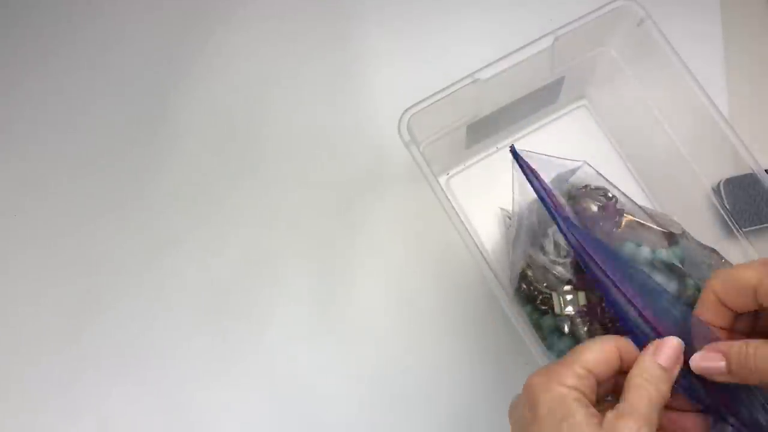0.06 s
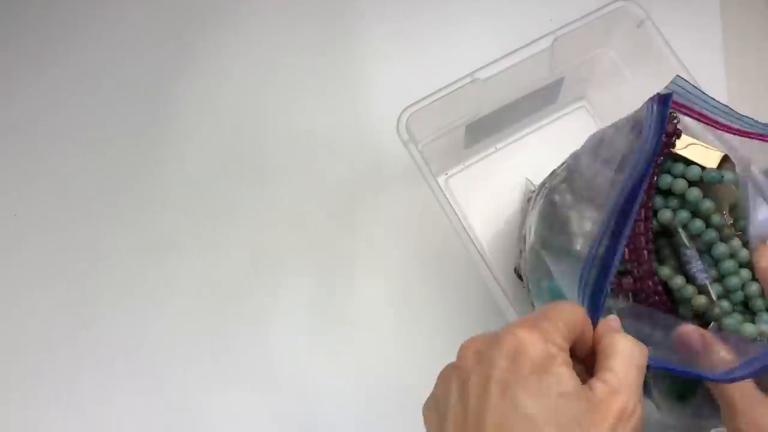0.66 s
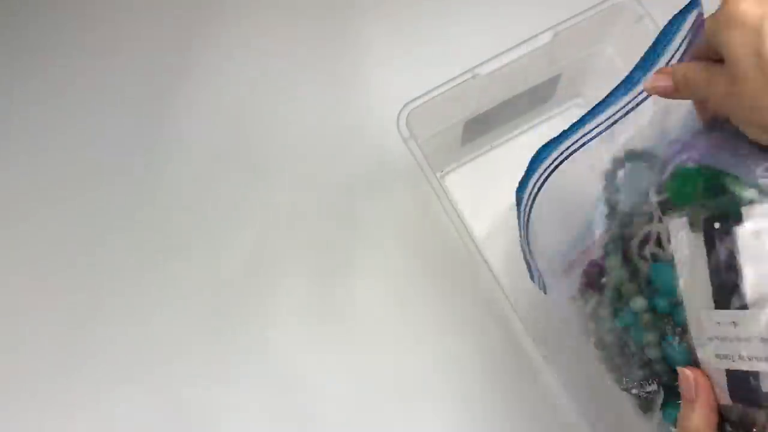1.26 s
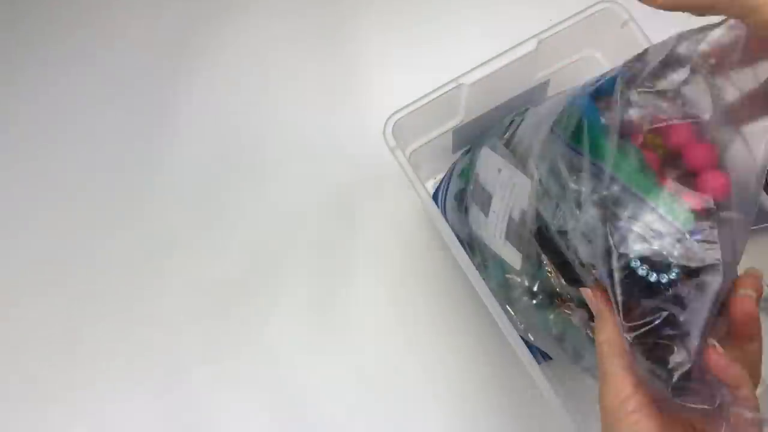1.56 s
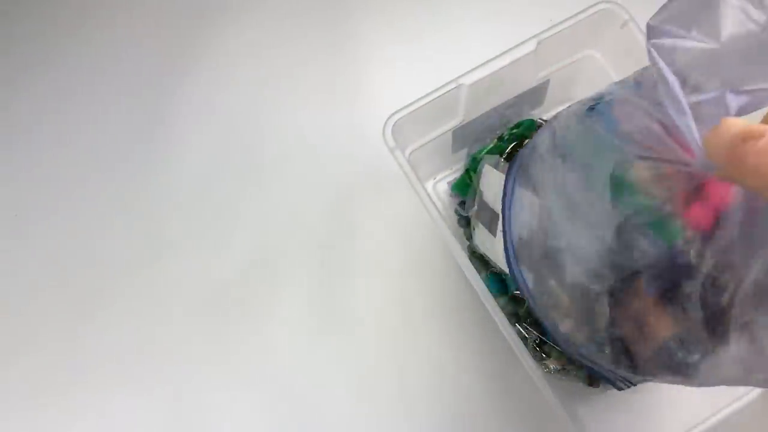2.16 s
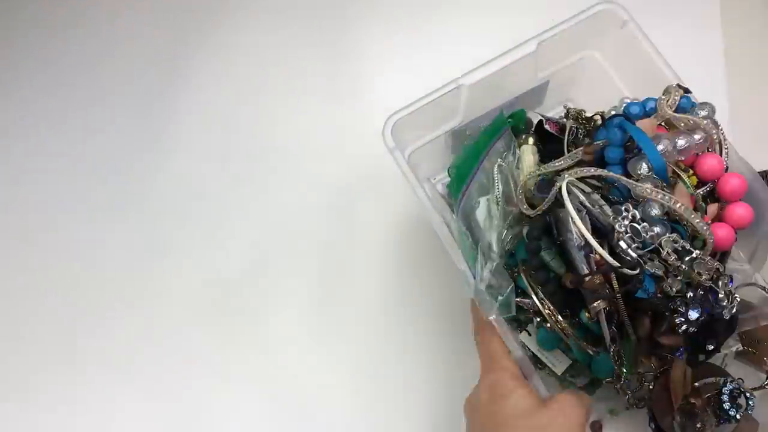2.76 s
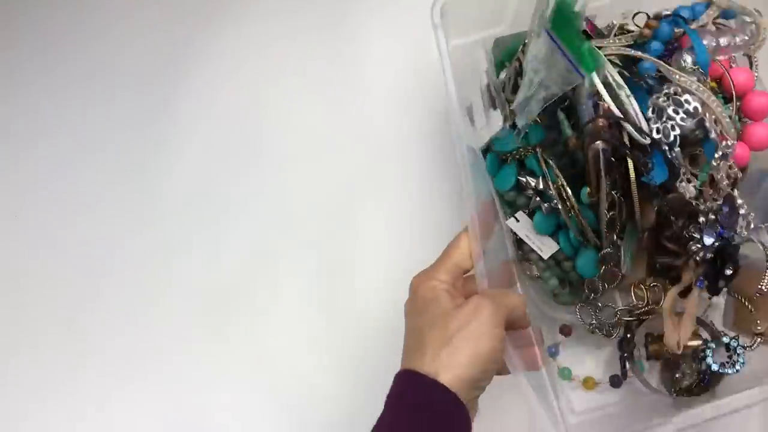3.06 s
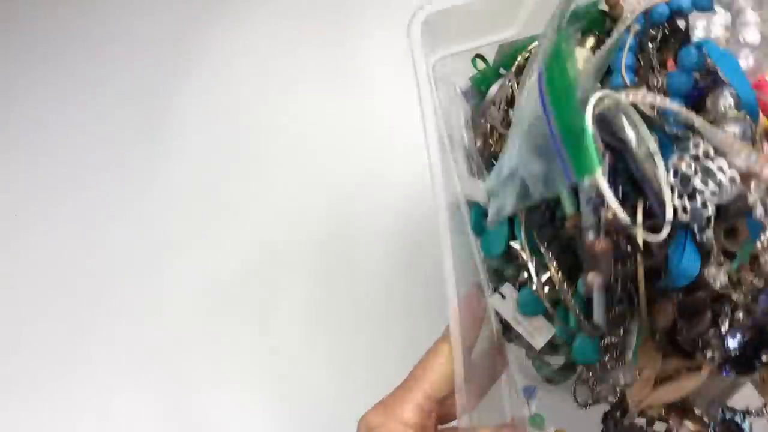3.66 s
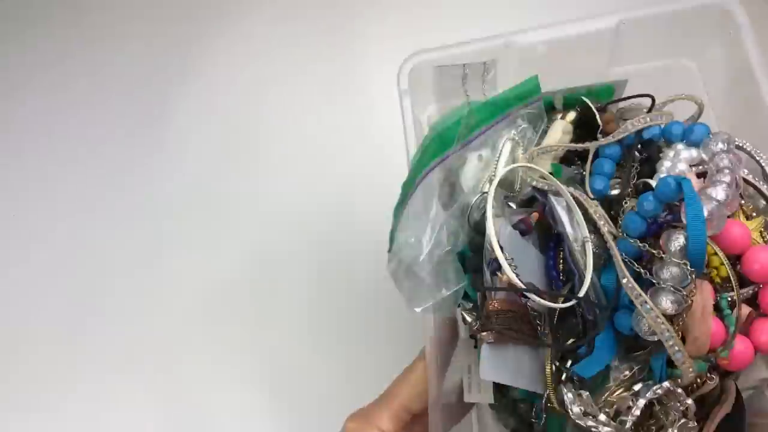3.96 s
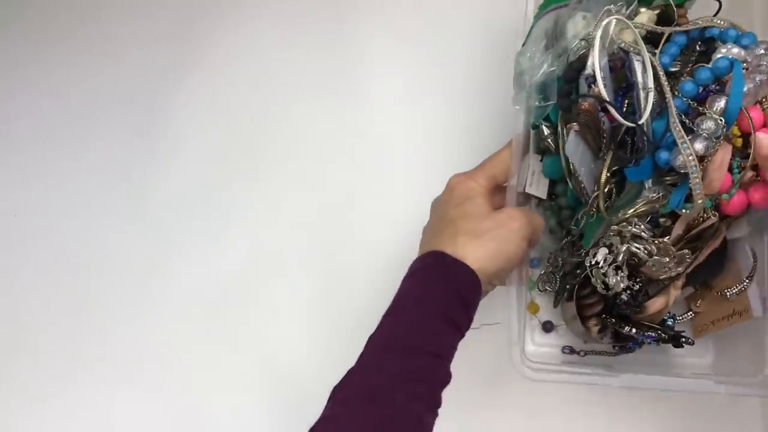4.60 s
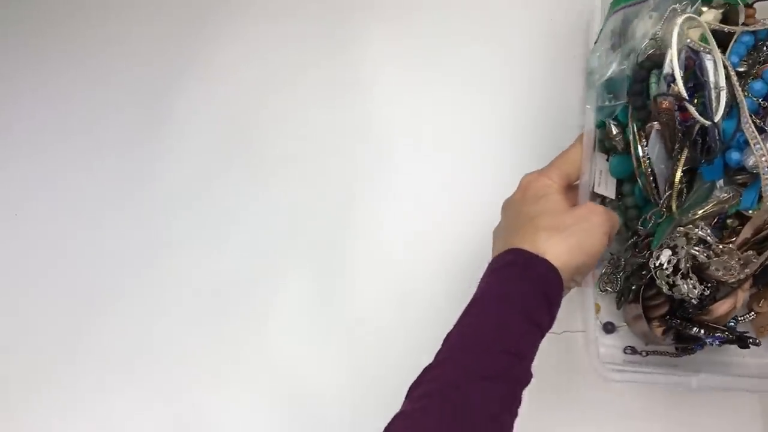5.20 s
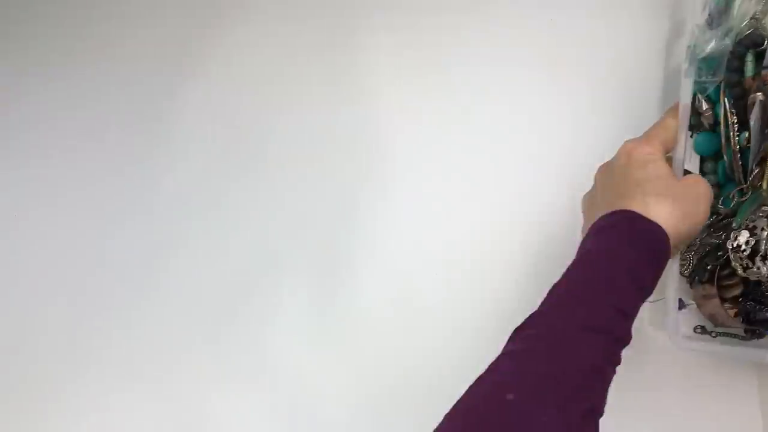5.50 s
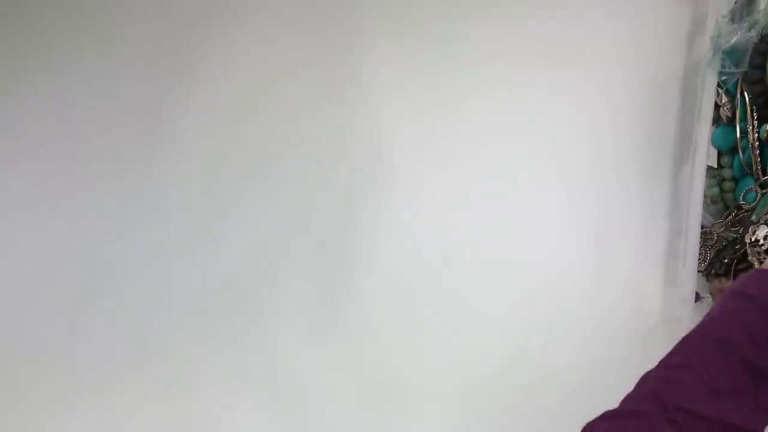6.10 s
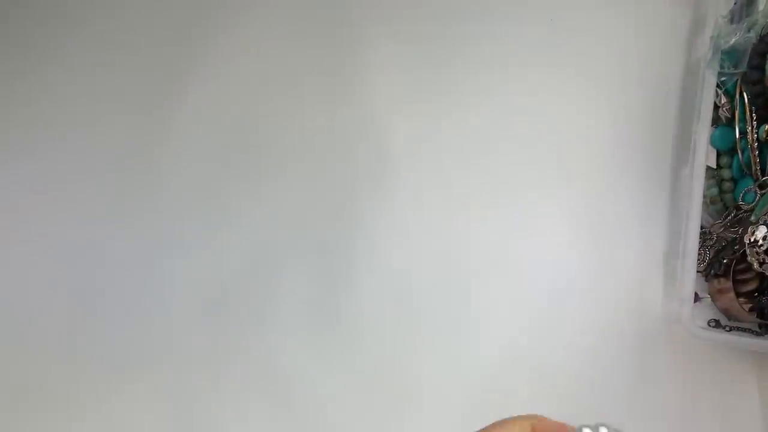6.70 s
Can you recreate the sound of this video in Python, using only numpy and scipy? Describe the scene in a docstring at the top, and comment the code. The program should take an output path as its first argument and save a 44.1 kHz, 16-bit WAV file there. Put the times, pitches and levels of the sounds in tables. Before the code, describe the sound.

Close up in a small room, thin plastic crackles and snaps as a bag is opened. Beads and bangles tumble out with dense clicks and hollow knocks as they land in a plastic tub. The full tub chatters down onto the table, then scrapes softly across it, with chains and small metal pieces jingling inside. The sound thins to a faint brush of a sleeve and a soft thump of a hand on the table.

```python
"""A zip bag of costume jewellery is pulled open, its film crinkling and snapping. From about 1.5 s
strings of beads spill into a plastic tub, whose walls ring lower as it fills. Near 3.8 s the tub is
set down and chatters on the table. From about 4.3 s it is pushed aside: its foot rubs and the metal
pieces inside jingle. Last, a sleeve brushes faintly as the arm withdraws.
All along, hands bump the table softly and a small room adds a short echo."""
import sys
import numpy as np
from scipy import signal
from scipy.fft import rfft, irfft
from scipy.io import wavfile
from scipy.ndimage import uniform_filter1d

SR = 44100
rng = np.random.default_rng(int(sys.argv[2]) if len(sys.argv) > 2 else 0)


def file_out(sig):
    """Save sig as 16-bit WAV at sys.argv[1]."""
    # one column per channel
    cols = np.atleast_2d(sig).T
    # limit, then scale
    lim = np.clip(cols, -1, 1)
    pcm = np.round(lim * 32767).astype(np.int16)
    wavfile.write(sys.argv[1], SR, pcm)


N = 302085
TIME = np.arange(N) / SR

# Tone of the crisp film and of the duller heap of beads. Each row: frequency in Hz, relative level in dB.
FILM_TONE = [(1200, -35.5), (2400, -9.5), (3300, 6.5), (5000, 4), (8000, 1.5), (11000, 3), (14000, 6.5),
             (15500, 1.5)]
HEAP_TONE = [(60, -12.5), (150, -4), (300, -3), (520, -4), (800, 0.5), (1050, -1), (1600, -3.5),
             (2500, -3.5), (3400, -10.5), (6000, -8.5), (14000, -45)]
# Tugs of the bag and slips of the heap. Each row: peak time in seconds, level in dB, body compared
# with treble in dB, rise and fall in seconds, bead pitch in Hz (low for large beads).
SURGES = [(.05, -49.5, 4.5, 0.086, 0.17, 1905), (.21, -59.5, 8, .07, 0.13, 1683),
          (0.278, -27, -0.5, 0.0082, 0.12, 1110), (0.432, -39, 3.5, 0.025, 0.16, 1140),
          (0.689, -41, 4.5, 0.04, 0.16, 1243), (.76, -33.5, -2, 0.065, 0.11, 1430),
          (.84, -41, 2, 0.045, 0.24, 1394), (1.12, -35, 0, 0.061, .08, 1340),
          (1.217, -37.5, -5, 0.019, 0.086, 1690), (1.41, -37, 0.5, 0.24, 0.19, 1590),
          (1.476, -30.5, 0.5, 0.043, 0.12, 1596), (1.528, -28, 0, 0.069, 0.1, 1640),
          (1.77, -35.5, -0.5, 0.2, 0.29, 1588), (1.998, -29, 2.5, 0.067, 0.075, 1250),
          (2.201, -36.5, 2.5, .09, 0.15, 970), (2.257, -31, -7, 0.063, 0.11, 1222),
          (2.465, -45, 3.5, 0.063, .06, 1400), (2.526, -31, 5, 0.068, 0.039, 1485),
          (2.604, -24, 2.5, 0.039, 0.035, 1624), (2.66, -27, 4, 0.041, 0.068, 1723),
          (2.89, -44, -0.5, 0.067, .15, 1860), (2.997, -27.5, 0.5, 0.045, 0.048, 1950),
          (3.06, -43.5, 1, 0.14, 0.092, 2004), (3.165, -42, 0.5, 0.036, .15, 2300),
          (3.25, -41, 0, 0.077, 0.19, 2290), (3.452, -50, 4.5, 0.1, 0.12, 2000),
          (3.697, -44.5, 4.5, 0.075, 0.058, 1135), (3.773, -20.5, 2.5, 0.021, 0.072, 1024),
          (3.838, -24.5, -0.5, 0.079, 0.14, 1000), (3.958, -31.5, -6, 0.046, 0.095, 1150),
          (4.009, -32.5, -1.5, 0.069, 0.12, 1170), (4.327, -44, 3, 0.12, 0.037, 2090)]

def pour():
    """Creases and beads tick brightly; the same contacts shake the heap and the tub, which sound lower."""
    peak_s, db, body_db, rise_s, fall_s, hz = np.transpose(SURGES)
    surges = swells(peak_s, rise_s, fall_s)
    # the strongest surge of the moment sets the pitch of the rolling beads
    power = (surges * undb(db)[:, None]) ** 2 + 1e-30
    bead_hz = per_sample(hz @ power / power.sum(0))
    ticks = crackle(per_second=1000, spread_db=5.3, tick_s=.0007, ring_t60=.028, ring=.5, pieces=60)
    grit = crackle(per_second=500, spread_db=6, tick_s=.0002, ring_t60=.01, ring=.2, pieces=12)
    clacks = crackle(per_second=520, spread_db=5.3, tick_s=.003, ring_t60=.02, ring=0, pieces=24)
    # the finest creases add very short, gritty ticks
    fine_creases = colour(grit, [(4000, -4), (9000, -6), (15000, -18)])
    treble = .99 * colour(ticks, FILM_TONE) + undb(-14) * fine_creases
    heap = colour(.5 * ticks + .5 * clacks, HEAP_TONE) + undb(-8.5) * rolling(clacks, bead_hz)
    body = heap + through_tub(clacks, wall_db=-24.5, floor_db=-29.5)
    return together(surges, db) * treble + together(surges, db + body_db) * body


def rolling(clatter, bead_hz, width_octaves=.78):
    """Rolling beads: keep the part of a clatter that lies near their moving pitch."""
    out = 0
    for centre_hz in np.geomspace(800, 4500, 9):
        nearness = np.exp(-.5 * (np.log2(centre_hz / bead_hz) / width_octaves) ** 2)
        band = signal.lfilter(*signal.iirpeak(centre_hz, 5, fs=SR), clatter)
        out = out + nearness * unit(band)
    return unit(out)


# Film snaps and bead clicks. Each row: start in seconds, relative level in dB, boost of its body in dB.
SNAPS = [(.0405, -30.5, -1), (.063, -21, -6.5), (.1637, -28.5, -2), (.276, -1, -12.5), (.287, -4.5, -29),
         (.3785, -17, -6), (.423, -13, -5), (.448, -19.5, -9), (.5774, -19.5, -32), (.734, -14.5, -21),
         (.7597, -7, -21), (.896, -19.5, -10.5), (.922, -21, -16), (.9793, -22, -7), (1.1117, -16, -13),
         (1.204, -16.5, -10), (1.471, -18, -1), (1.498, -11, -2.5), (1.685, -23, -8), (1.81, -13.5, -13),
         (1.8606, -20.5, 3), (2.2487, -9.5, -10), (2.3105, -11.5, -14.5), (2.52, -12, -19),
         (2.586, -24, -7.5), (2.6455, -7, -21.5), (2.6756, -15.5, -1.5), (2.784, -27.5, -9),
         (2.991, -10.5, -15.5), (3.2306, -15, -24), (3.381, -22.5, -10.5), (3.4516, -23.5, -12.5),
         (3.6156, -29, -5.5), (3.689, -20, -19), (3.7662, -18, -14.5), (3.773, -4, -35), (3.843, -6, -28),
         (3.9494, -12, -19), (4.3125, -32, 6.5), (4.336, -18, -33)]

def snaps():
    """A crease snaps or two beads hit; plastic hardly rings."""
    return clicks(SNAPS, FILM_TONE, bright_db=3, body_db=9.5,
                  ring_t60=.02, ring=.3, crack_s=.0011, rattle_s=.0075)


# Bangles and large beads. Each row: start in seconds, pitch in Hz, level in dB, ring time in seconds.
CHINKS = [(.164, 3520, -41, 0.069), (0.21, 2770, -44, 0.035), (1.905, 13200, -30, .12),
          (2.741, 4320, -41, 0.058), (3.222, 2710, -31, .05), (3.23, 2340, -27.5, .08),
          (3.232, 4030, -37.5, 0.06), (4.335, 7540, -36, .04), (5.296, 6270, -25, .04),
          (5.436, 11300, -30, 0.044), (5.506, 6000, -27, 0.067), (5.681, 5800, -52.5, 0.1)]

def chinks():
    """A struck bangle or bead rings briefly with two close notes that beat against each other."""
    out, t = np.zeros(N), np.arange(SR // 4) / SR
    for start_s, hz, db, t60 in CHINKS:
        pair_hz = hz * (1 + .03 * rng.uniform(-.41, 1, (2, 1)))
        notes = np.sin(2 * np.pi * pair_hz * t).mean(0)
        add(out, start_s, undb(db) * notes * fading(t60, t))
    return out


# Notes of the full tub's walls and floor. Each row: pitch in Hz, relative level in dB, ring in seconds.
WALL_NOTES = [(637, -9, .12), (680, -4, .13), (794, -4, .11), (837, 1, .14), (885, -9, .1), (932, -1, .12),
              (974, -5, .1), (1040, -10, .1), (1168, -10, .1), (1539, -6, .09), (1631, -4, .09),
              (1731, -6, .08), (1808, -9, .07), (2016, -10, .08), (2247, -12, .07), (2520, -8, .07)]
FLOOR_NOTES = [(215, -14, .06), (249, 0, .13), (315, -6, .06), (410, -8, .05), (520, -5, .05),
               (600, -6, .04)]
# Blows on the tub. Each row: start in seconds, wall level in dB, floor level in dB,
# hardness in dB per octave (higher is brighter).
KNOCKS = [(1.469, -22.5, -29.5, 0), (1.496, -21, -28.5, 0), (1.975, -23, -58, -3), (2.01, -27, -52, -1),
          (2.249, -19, -39, 2), (2.647, -14, -21, 7), (2.677, -35, -39, 9), (2.995, -21.5, -47, 11.5),
          (3.279, -31, -54, 3.5), (3.642, -31, -33, -5), (3.689, -30.5, -56, 10), (3.815, -15.5, -27, -20),
          (3.823, -15, -30, 2), (3.95, -12, -29, 5.5), (3.998, -18.5, -53, 7), (4.010, -20, -56, 8.5),
          (4.312, -36.5, -29.5, 16), (4.486, -28.5, -66, 3), (4.654, -34.5, -39.5, 4),
          (4.779, -43, -42.5, 16), (5.405, -32, -38, -9), (5.546, -24.5, -28.5, 12)]

def tub(empty_pitch_ratio=1.66, filling_s=(1.5, 3.76)):
    """Each blow makes the floor thud and the walls ring; the walls sink in pitch as the tub fills."""
    out = np.zeros(N)
    for start_s, wall_db, floor_db, hardness in KNOCKS + chatter():
        pitch_ratio = np.interp(start_s, filling_s, (empty_pitch_ratio, 1))
        walls = struck(WALL_NOTES, pitch_ratio, scatter=.005, hardness=hardness)
        floor = struck(FLOOR_NOTES, 1, scatter=.02)
        add(out, start_s, undb(wall_db) * walls + undb(floor_db) * floor)
    return out


def chatter(start_s=3.766, gap_s=.0115, count=12, first_db=-15.5, loss_db=12, hardness=2.6):
    """The tub rocks to rest: more rows of knocks, almost evenly spaced, strong at first, then fading."""
    gaps = gap_s * (1 + .15 * rng.standard_normal(count))
    starts = start_s + np.cumsum(gaps) - gaps
    wall_db = first_db - loss_db * np.linspace(0, 1, count) ** 2
    return [(s, db, db - 23, hardness) for s, db in zip(starts, wall_db)]


def struck(notes, pitch_ratio, scatter, hardness=0):
    """One blow rings all the notes; hard blows favour the high ones, and the shifting load detunes them."""
    t = np.arange(SR // 4) / SR
    hz, db, t60 = np.transpose(notes)[:, :, None]
    weight, detune, side = rng.standard_normal((3, len(notes), 1))
    waves = np.sign(side) * np.sin(2 * np.pi * hz * pitch_ratio * (1 + scatter * detune) * t)
    gains = undb(db + 2 * weight + hardness * np.log2(hz / hz[0]))
    ring = (gains * waves * fading(t60, t)).sum(0)
    return ring / np.abs(ring).max()


def through_tub(contacts, wall_db, floor_db):
    """Small contacts against the tub also stir its walls and floor."""
    walls = unit(convolve(contacts, struck(WALL_NOTES, 1, scatter=0)))
    floor = unit(convolve(contacts, struck(FLOOR_NOTES, 1, scatter=0)))
    return undb(wall_db) * walls + undb(floor_db) * floor


# Tone of the jingling and of the rubbing. Each row: frequency in Hz, relative level in dB.
JINGLE_TONE = [(1500, -9), (3500, -6.5), (5000, -4), (6300, -5.5), (8000, -2), (9600, -6), (10800, -11.5),
               (12000, -18), (16000, -29.5)]
RUB_TONE = [(50, -1.5), (90, 2.5), (125, 8.5), (180, 1.5), (260, -1), (450, 5), (800, -2), (1300, 2),
            (2200, -1.5), (3500, -13), (7000, -9), (14000, -48.5)]
# Pushes of the tub, then a sleeve's faint brushing as the arm withdraws (the last two rows).
# Each row: peak time in seconds, jingle in dB, rubbing in dB, rise and fall in seconds.
MOVES = [(4.36, -59, -48, 0.051, 0.28), (4.495, -46.5, -60, 0.12, 0.23), (4.66, -53, -47.5, .42, 0.44),
         (4.92, -81, -53.5, 0.46, 0.67), (5.298, -41.5, -48, 0.38, 0.57), (5.404, -33.5, -38, 0.18, 0.21),
         (5.562, -34.5, -34.5, 0.056, 0.092), (5.74, -75, -53, 0.44, 0.13), (6.053, -42, -47.5, .1, 0.092),
         (6.54, -63, -66, 0.22, 0.31), (6.84, -87, -64, 0.21, 0.12)]

def slide_and_brush():
    """The tub judders over the table and its chains jingle; the same sounds, faint, make a sleeve's hiss."""
    peak_s, jingle_db, rub_db, rise_s, fall_s = np.transpose(MOVES)
    moves = swells(peak_s, rise_s, fall_s)
    links = crackle(per_second=800, spread_db=5, tick_s=.001, ring_t60=.04, ring=.8, pieces=60)
    slips = crackle(per_second=700, spread_db=4.5, tick_s=.003, ring_t60=.02, ring=0, pieces=16)
    jingle = colour(links, JINGLE_TONE)
    rubbing = colour(slips, RUB_TONE) + through_tub(slips, wall_db=-12.5, floor_db=-24)
    return together(moves, jingle_db) * jingle + together(moves, rub_db) * rubbing


# Tone of small metal pieces. Each row: frequency in Hz, relative level in dB.
METAL_TONE = [(1500, -49), (3500, -11), (5000, -1), (6500, 9.5), (9000, 9), (10500, 0), (12500, -5.5),
              (16000, -12)]
# Metal clinks. Each row: start in seconds, relative level in dB, boost of its body in dB.
CLINKS = [(4.4695, -26.5, -12), (4.4854, -12, -22), (4.502, -18.5, -44), (4.618, -17.5, -30),
          (4.6564, -30.5, 1.5), (4.6725, -24.5, -17), (4.7798, -29.5, -6), (4.968, -35, -34),
          (5.024, -29.5, -32), (5.085, -29.5, -12.5), (5.1155, -21, -16.5), (5.1602, -31, -18),
          (5.183, -27, -17), (5.205, -24.5, -13), (5.2385, -17, -41), (5.2975, -11, -32), (5.3836, -8, -41),
          (5.4044, -13.5, -33), (5.437, -11, -49), (5.5085, -15.5, -31), (5.554, -36, 5),
          (5.7992, -31.5, -41), (5.8301, -37.5, -15), (5.94, -44.5, 5.5), (6.043, -25.5, -11.5),
          (6.2557, -50, -29.5), (6.298, -56, 2), (6.779, -44.5, -7.5)]

def clinks():
    """Metal pieces hit each other in the tub and ring longer than plastic."""
    return clicks(CLINKS, METAL_TONE, bright_db=6.5, body_db=15.5,
                  ring_t60=.051, ring=.58, crack_s=.0072, rattle_s=.0055)


# Hands on the table. Each row: start in seconds, peak level in dB, rise time in seconds.
BUMPS = [(0.228, -29, 0.000067), (0.358, -24.5, 0.0023), (0.438, -24.5, 0.0024), (1.321, -24, 0.00025),
         (1.701, -24, 0.00033), (3.276, -26, 0.0015), (3.895, -26, 0.002), (4.23, -23.5, 0.00042),
         (4.391, -28.5, 0.0013), (4.653, -28.5, 0.0021), (6.47, -16.5, 0.00037)]

def bumps(release_s=.003):
    """A hand gives the table one soft push, with no ringing."""
    out, t = np.zeros(N), np.arange(SR // 10) / SR
    for start_s, db, rise_s in BUMPS:
        push = np.exp(-t / release_s) * (1 - np.exp(-t / max(rise_s, 1e-4))) ** 2
        add(out, start_s, -undb(db) * push / push.max())
    return out


# Tone of the hands' rumble. Each row: frequency in Hz, relative level in dB.
RUMBLE_TONE = [(8, 2.5), (20, -7), (35, -16), (60, -22), (100, -29.5), (200, -42), (500, -86)]

def rumble():
    """A deep noise rises and falls with the effort of the moving hands."""
    times_s = [0, .4, .65, 1.7, 3.3, 4.3, 5, 5.5, 6.8]
    effort_db = np.interp(TIME, times_s, [-5.5, 7.5, -2.5, 3.5, 3.5, -1.5, -3, -4, -2.5])
    return undb(effort_db - 40) * colour(rng.standard_normal(N), RUMBLE_TONE, size=16384)


def room(sound, echo_db=-14, low_t60=.22, high_t60=.1, split_hz=3800):
    """A small room adds a smooth echo whose treble dies first."""
    t = np.arange(SR // 2) / SR
    low_noise, high_noise = rng.standard_normal((2, len(t)))
    low = signal.sosfilt(signal.butter(2, split_hz, fs=SR, output="sos"), low_noise)
    high = signal.sosfilt(signal.butter(2, split_hz, "high", fs=SR, output="sos"), high_noise)
    build_up = 1 - np.exp(-t / .0013)
    tail = (low * fading(low_t60, t) + high * fading(high_t60, t)) * build_up
    return sound + undb(echo_db) * convolve(sound, tail / np.linalg.norm(tail))


# Tone of the quiet room. Each row: frequency in Hz, relative level in dB.
AIR_TONE = [(30, 1.5), (100, -27), (300, -6), (800, -17), (2000, -24), (6000, -23.5), (11000, -38.5),
            (16000, -58)]

def air():
    """Still air is a faint, steady noise."""
    return undb(-70.5) * colour(rng.standard_normal(N), AIR_TONE)


def clicks(rows, tone, bright_db, body_db, ring_t60, ring, crack_s, rattle_s):
    """Each hard contact cracks, rattles its neighbours and pushes into the heap, which gives it body."""
    bright, body = np.zeros(N), np.zeros(N)
    for start_s, db, boost_db in rows:
        click = piece(crack_s, ring_t60, ring) + piece(rattle_s, ring_t60, ring)
        push = piece(crack_s, ring_t60, 0) + piece(rattle_s, ring_t60, 0)
        add(bright, start_s, undb(db) * click)
        add(body, start_s, undb(db + boost_db) * push)
    return undb(bright_db) * colour(bright, tone) + undb(body_db) * colour(body, HEAP_TONE)


def crackle(per_second, spread_db, tick_s, ring_t60, ring, pieces):
    """Many pieces collide at random, most faintly and a few strongly, at an even overall loudness."""
    out, hits = np.zeros(N), int(per_second * N / SR / pieces)
    for _ in range(pieces):
        blows = np.zeros(N)
        strengths = undb(spread_db * np.minimum(rng.exponential(size=hits), 3.2))
        blows[rng.integers(0, N, hits)] = strengths
        out += convolve(blows, piece(tick_s, ring_t60, ring))
    window = SR // 40
    local_power = uniform_filter1d(uniform_filter1d(out ** 2, window), window)
    return out / np.sqrt(local_power + 1e-6)


def piece(tick_s, ring_t60, ring, note_count=7):
    """One small piece or crease ticks; ring sets how strong its high notes are next to the tick."""
    t = np.arange(SR // 12) / SR
    # the second burst is the tick bouncing off the table and the tub's walls
    tick = burst(tick_s, t) + .45 * burst(.004, t)
    size_hz = rng.uniform(3500, 15500)  # a broad peak set by the size of the piece
    if ring:
        tick += 2 * signal.lfilter(*signal.iirpeak(size_hz, 4, fs=SR), tick)
    hz = rng.uniform(5200, 16000, (note_count, 1))
    waves = rng.standard_normal((note_count, 1)) * np.sin(2 * np.pi * hz * t)
    notes = waves.sum(0) * fading(ring_t60, t)
    sound = tick / np.linalg.norm(tick) + ring * notes / np.linalg.norm(notes)
    return sound / np.linalg.norm(sound)


def burst(decay_s, t):
    """A dying puff of noise with a total energy of 1."""
    noise = rng.standard_normal(len(t)) * np.exp(-t / decay_s)
    return noise / np.linalg.norm(noise)


def swells(peak_s, rise_s, fall_s):
    """Each movement's gain, once a millisecond: up 20 dB in its rise time, down 20 dB in its fall time."""
    since = np.arange(0, N / SR, .001) - peak_s[:, None]
    before = -since / np.maximum(rise_s[:, None], 1e-3)
    after = since / np.maximum(fall_s[:, None], 1e-3)
    drop_db = 20 * np.maximum(before, after) ** 1.24  # a power above 1 rounds the peak
    return undb(-np.minimum(drop_db, 200))


def together(movements, db):
    """Gain of overlapping movements, whose powers add."""
    return per_sample(np.linalg.norm(movements * undb(db)[:, None], axis=0))


def per_sample(control):
    """Stretch one value a millisecond to one value a sample."""
    return np.interp(TIME, np.arange(len(control)) / 1000, control)


def colour(sound, tone, size=2048):
    """Filter a sound so that it takes on a tone given as (Hz, dB) points."""
    hz, db = np.transpose(tone)
    grid_hz = np.maximum(np.arange(size // 2 + 1) * SR / size, 1)
    gains = undb(np.interp(np.log(grid_hz), np.log(hz), db))
    # folding the cepstrum keeps the filter from sounding before a hit arrives
    cepstrum = irfft(np.log(gains))
    cepstrum[1:size // 2] *= 2
    cepstrum[size // 2 + 1:] = 0
    response = irfft(np.exp(rfft(cepstrum)))
    return convolve(sound, response / np.linalg.norm(response))


def convolve(sound, response):
    """Pass a sound through a response, keeping its length."""
    return signal.oaconvolve(sound, response)[:len(sound)]


def fading(t60, t):
    """A fade that loses 60 dB in t60 seconds, the ring time."""
    return np.exp(-np.log(1000) * t / t60)


def add(track, start_s, sound):
    """Mix a sound in at its start time."""
    i = max(int(start_s * SR), 0)
    track[i:i + len(sound)] += sound[:N - i]


def undb(db):
    """Turn decibels into a gain."""
    return 10 ** (np.asarray(db) / 20)


def unit(sound):
    """Scale to an average power of 1."""
    return sound / np.sqrt(np.mean(sound ** 2))


def scene():
    """The bag, jewellery and tub echo in the room, over still air and the sounds of the hands."""
    on_table = snaps() + clinks() + pour() + slide_and_brush() + chinks() + tub()
    return (room(on_table) + air() + bumps() + rumble())[None]


def record(dry):
    """The phone cuts the treble above 16250 Hz."""
    return signal.sosfilt(signal.ellip(10, .2, 70, 16250, fs=SR, output="sos"), dry)


dry = scene()
out = record(dry)
file_out(out)
```